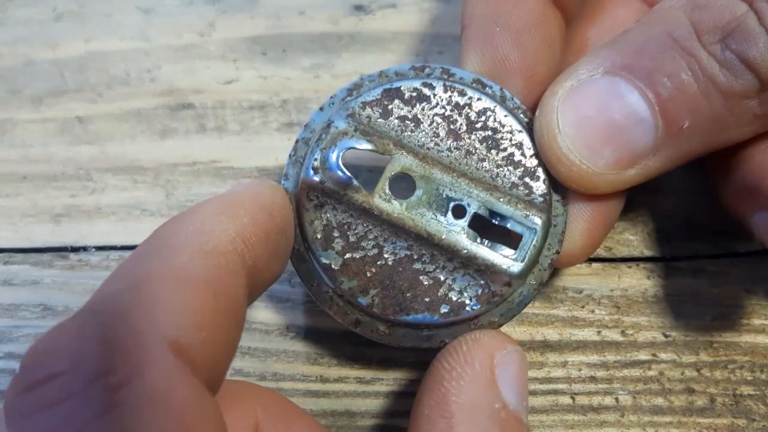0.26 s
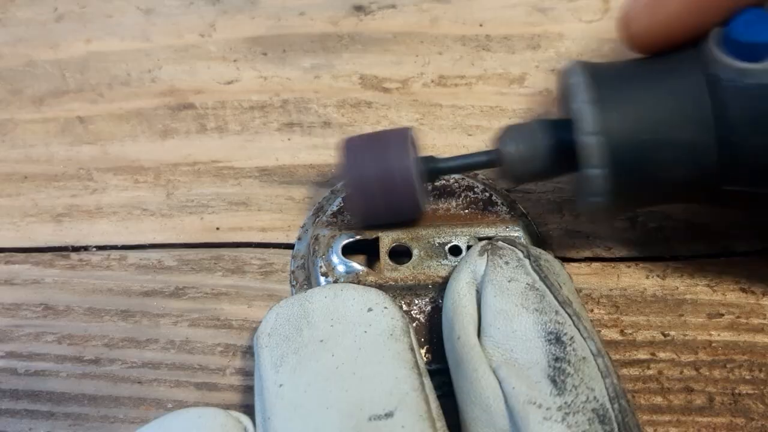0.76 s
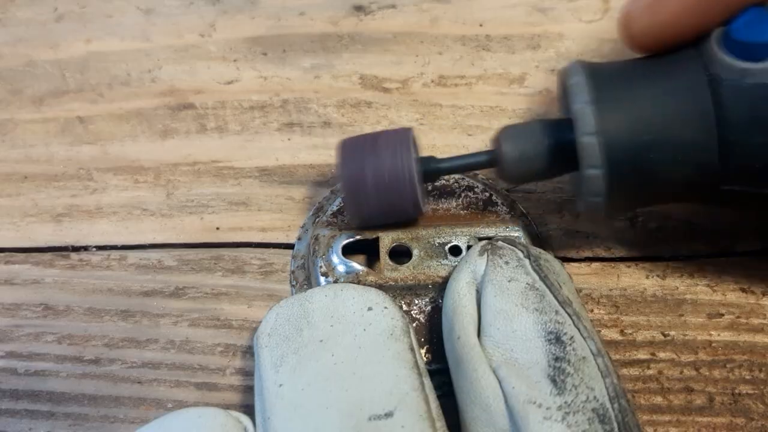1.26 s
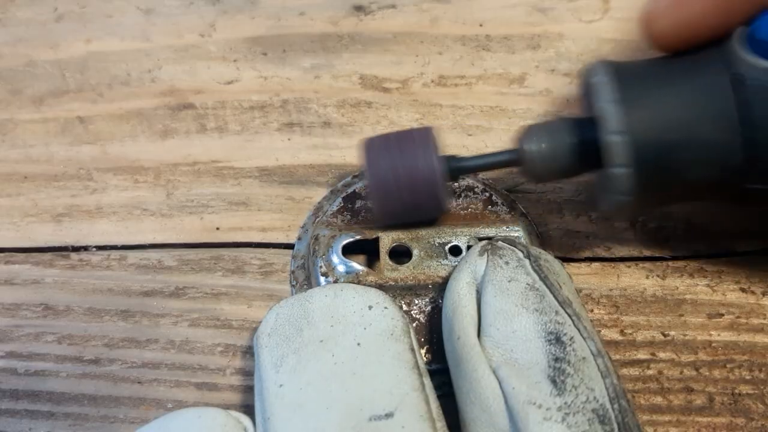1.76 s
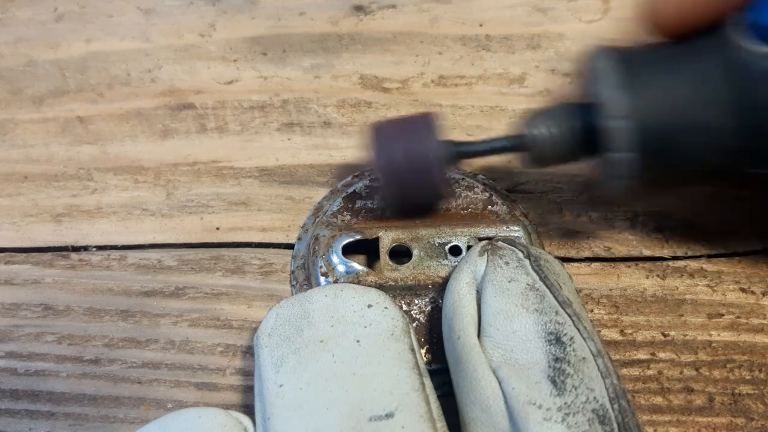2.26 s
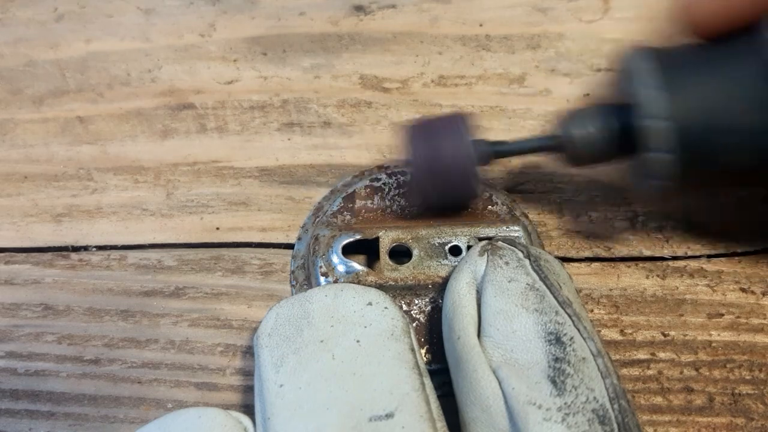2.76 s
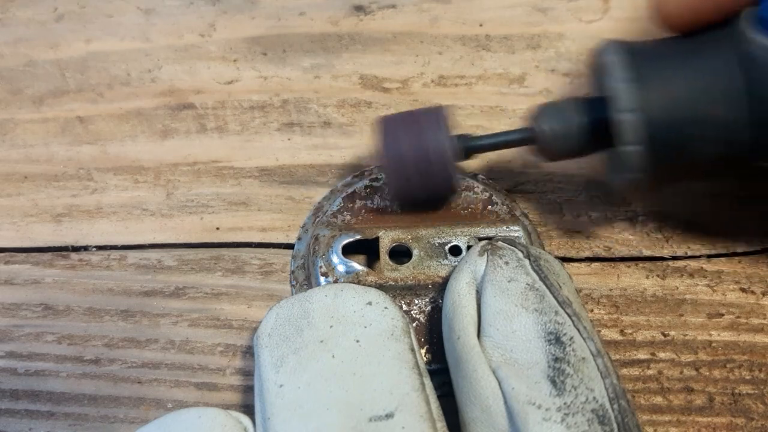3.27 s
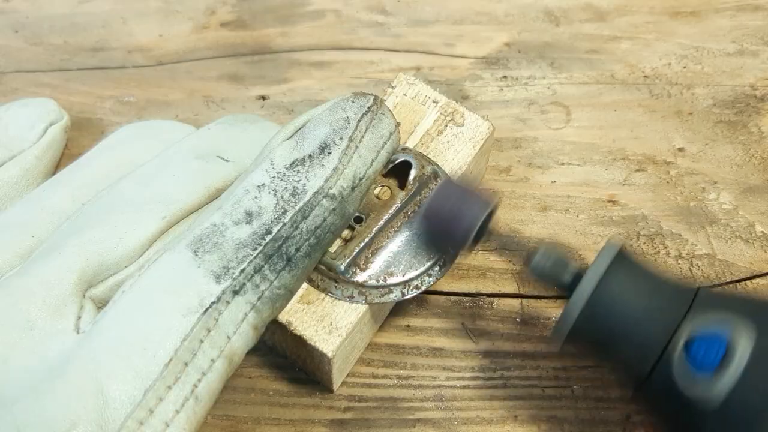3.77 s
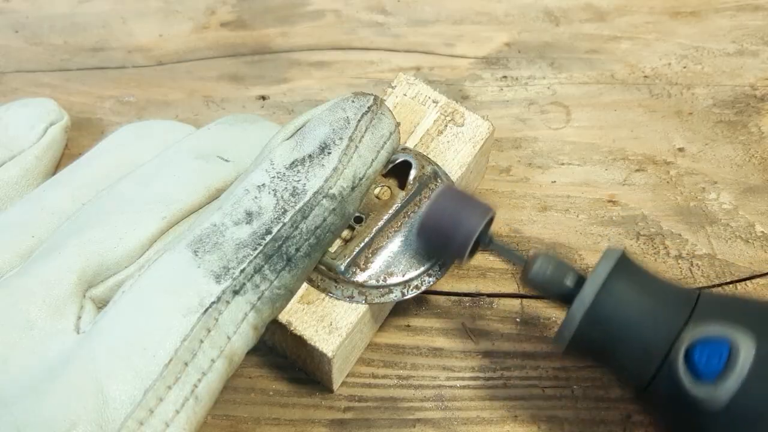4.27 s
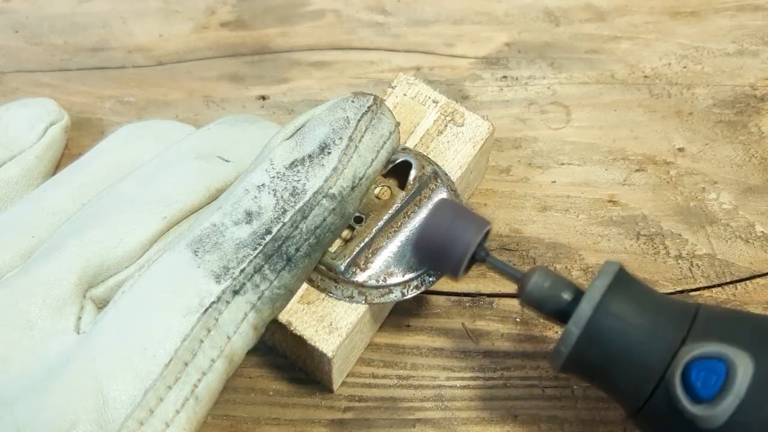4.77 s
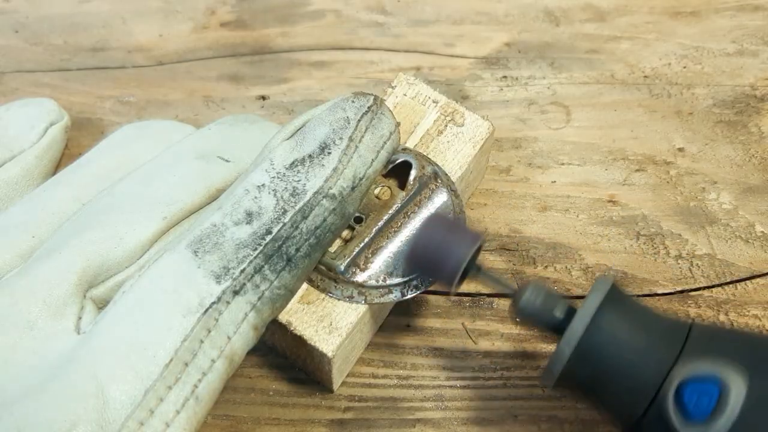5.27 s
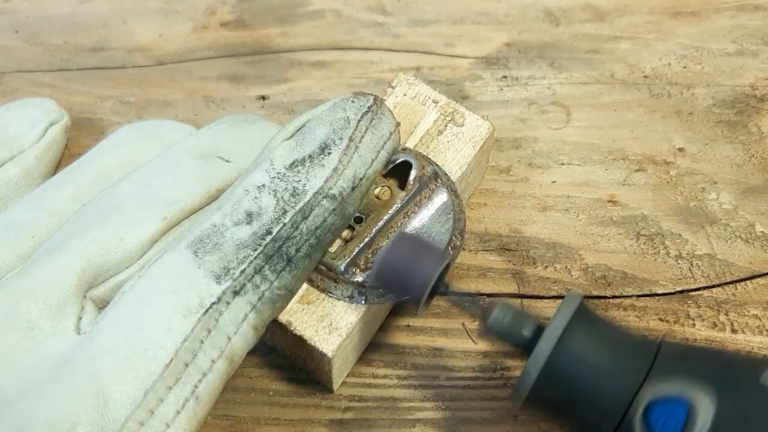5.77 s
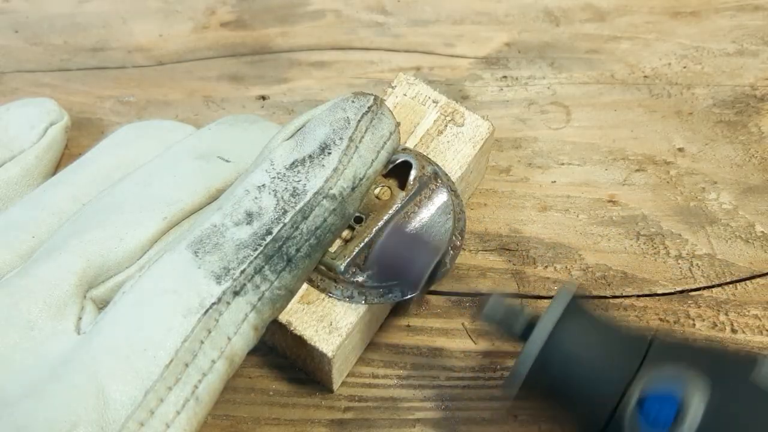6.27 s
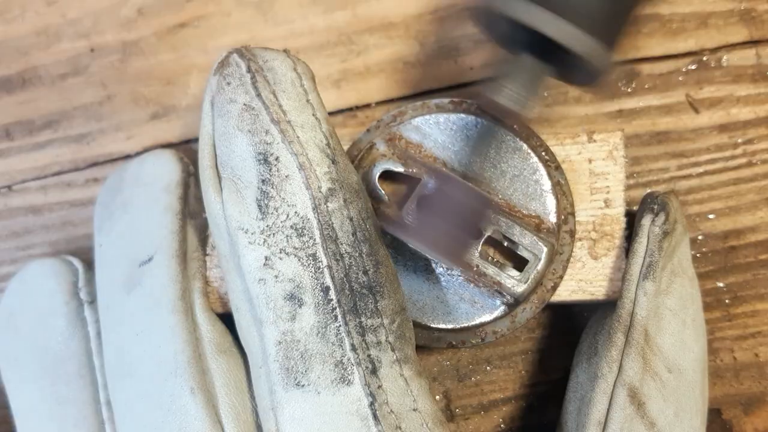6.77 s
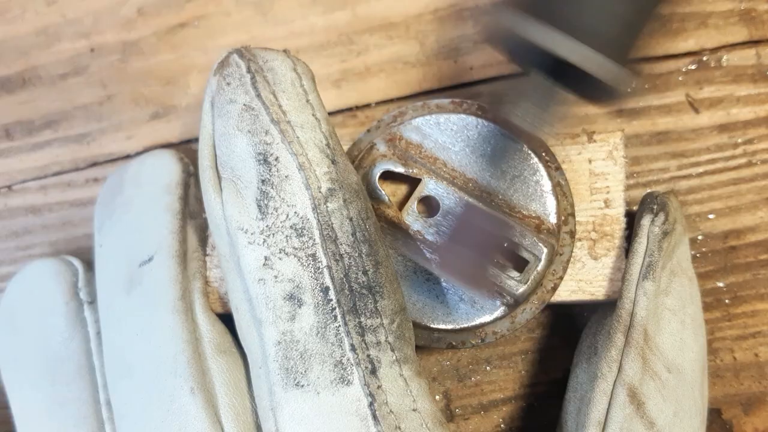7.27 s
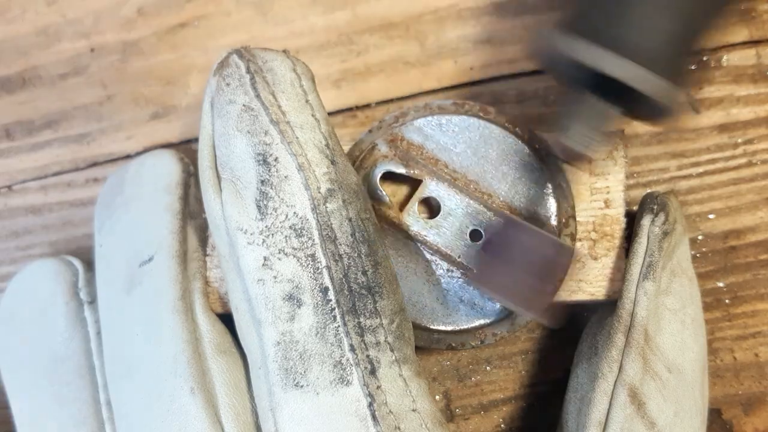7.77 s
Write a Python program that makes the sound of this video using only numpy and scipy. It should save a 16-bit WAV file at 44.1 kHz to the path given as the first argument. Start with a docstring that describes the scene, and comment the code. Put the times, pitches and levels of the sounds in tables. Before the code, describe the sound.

Close stereo sound in a small, dry workshop: faint low room hum, then a sanding drum gritting against thin rusty metal. It scrapes unevenly to and fro with tiny ticks, switches suddenly to a strong ringing whirr that sags and revs up again, then switches to sharp, hissy strokes with a lower buzz, short dropouts and dull thuds to the right. A thin high fan hiss stays underneath; it ends mid-grinding.

```python
"""A small rotary tool sands a rusty metal cap on a wooden bench, in three holds after a moment of quiet room.
Periodic excitation: an untrue drum bites once or twice a turn and its returning grit drives the modes as a buzz.
Loose grit adds a treble scratch; an unpulsed noise between the bites swells and fades with the strokes.
The unbalanced shaft hums; hard bites knock the bench as damped low sines, mostly in the right channel.
Behind lie the steady hiss of a fan and the filtered noise and mains hum of a workshop."""
import sys
import numpy as np
from scipy import signal
from scipy.fft import rfft, irfft, next_fast_len
from scipy.io import wavfile
from scipy.ndimage import uniform_filter1d, map_coordinates

SR = 44100
rng = np.random.default_rng(int(sys.argv[2]) if len(sys.argv) > 2 else 0)


def pcm_store(signal):
    """Save signal as 16-bit PCM."""
    levels = np.round(np.clip(np.atleast_2d(signal), -1, 1) * 32767)
    wavfile.write(sys.argv[1], SR, levels.astype(np.int16).T)


N = 353858

# boundaries of the holds, where the grip changes: [t/s]
HOLD_BOUNDS = (0.74, 3.682, 6.6, 8.03)
# speed of the drum per hold, sagging with each stroke in the second, drifting slowly in the third:
# [t/s, speed/turns per s]
DRUM_SPEED = [
    [(0.74, 87), (3.68, 87)],
    [(3.69, 74.1), (3.72, 73.2), (3.81, 66.6), (3.87, 66.3), (4.0, 70.9), (4.15, 70.3), (4.29, 79.7),
     (4.34, 80.7), (4.42, 80.1), (4.48, 84.4), (4.53, 85.7), (4.63, 83.9), (4.76, 90), (4.9, 90.1),
     (4.98, 96.1), (5.13, 90.4), (5.21, 96.1), (5.39, 90), (5.47, 94.4), (5.63, 89.6), (5.72, 91.8),
     (5.86, 87.2), (5.97, 89.7), (6.06, 87.5), (6.14, 88), (6.23, 91), (6.3, 87.8), (6.43, 91),
     (6.55, 88.5), (6.59, 90)],
    [(6.6, 71), (6.8, 72), (7.2, 71), (7.5, 69.5), (7.68, 67.5), (7.8, 70), (8.03, 66)],
]
# bite statistics per hold: [width/turns, scatter/dB, jitter/turns, grit kept per turn/0-1,
#   relative level of the unpulsed noise/dB, grain spread/dB, left-channel lag/samples]
CONTACT_STATISTICS = [(0.27, 2, 0.11, 0.19, 1, 5.5, 7.3), (0.17, 0.92, 0.042, 0.86, -12, 5, 4.63),
                      (0.15, 1, 0.063, 0.77, -12.5, 3.5, 6.94)]
# variation per hold: [second bite sway/dB, mode lean/dB, thump share of the rumble/0-1]
VARIATION = [(9.5, 0.5, 0.14), (4.5, 1.5, 0.06), (2.5, 2.5, 0.76)]
# strokes to and fro, each from its turning point:
# [t/s, pause/s, easing off/dB, ring/dB, upper middle register/dB, scratch/dB, second bite level/dB]
HAND_STROKES = [(0.74, 0.062, 5, -0.5, -3.5, -1.5, 1), (1.071, 0.034, 14, -2, -6, 0.5, 0),
                (1.228, 0.1, 9, 6, -13.5, -2.5, -13), (1.572, 0.083, 11, -1.5, -1, -2, -11),
                (1.854, 0.057, 6, 4.5, -6, -2, -3), (2.168, 0.086, 8.5, 3, 7.5, 0, -5),
                (2.381, 0.067, 6, 0.5, 0.3, -1.5, -18), (2.658, 0.07, 7, 0, 10, -1, -2),
                (2.932, 0.11, 4.5, -4.5, -3.5, -0.5, -9), (3.183, 0.045, 6.5, 8, 11, 1, 8),
                (3.33, 0.071, 10.5, 1.5, 1.5, 0.5, -6), (3.611, 0.11, 12.5, 7, 7, 2, 5),
                (3.69, 0.05, 0.0, 2.5, -4, -1.5, -12), (3.988, 0.039, 10.5, 6, 6, 0.5, -6),
                (4.231, 0.15, 4, 2, -13, 0, -11), (4.487, 0.054, 4, 0, 0, 0, -4),
                (4.692, 0.041, 5, 7, -4.5, 0.5, -5), (4.953, 0.02, 8, -2, 9, -0.5, -5),
                (5.169, 0.016, 15, -6, -3, -2, -4), (5.434, 0.02, 10, -0.5, 7, 0.5, -9),
                (5.685, 0.018, 7.5, 0, 6, 0.5, -14), (5.926, 0.028, 3, -2.5, 3, -0.5, -12),
                (6.167, 0.034, 3.5, 4, -7, -1, -9), (6.398, 0.02, 2.5, 0, -4, -0.5, -15),
                (6.602, 0.023, 5, 3, 1, -5, 6), (6.771, 0.025, 19, -2, 2, -1, -4),
                (7.053, 0.062, 12, 4.5, -5, 7, -8), (7.229, 0.062, 7.5, -1, 6, -1.3, -10.5),
                (7.549, 0.032, 18, 5, -14, 0.5, -9.5), (7.797, 0.051, 8, 4, -1, -2, -12)]
# per hold, rows for rumble, ring, upper middle register (scratch in holds 1 and 3, buzz in hold 2)
# and top: [level/dB, share of the easing off, share of the stroke's dB, lag/s]
STROKE_RESPONSE = [
    [(-57, -0.053, -0.1, -0.12), (-42, 0.89, 0.5, -0.013), (-42, 0.18, 0.2257, 0.017),
     (-35, 1, 2.5, 0.00033)],
    [(-61, 0.63, 1.5, -0.00085), (-38.5, 0.51, 0.5, -0.016), (-36.5, 0.7, 0.24, -0.0048),
     (-39, 0.61, 1.14, -0.00035)],
    [(-48, 2.12, 2.5, -0.0026), (-52, 0.28, 0, 0.068), (-41.5, 0.12, 0.16, 0.0092),
     (-45, 0.45, 0.4, -0.0029)],
]
# chatter, the drum biting twice a turn: [centre t/s, half length/s, rise of second bite/dB]
CHATTER_SPELLS = [(3.802, 0.061, 10), (6.693, 0.045, 2.5), (6.894, 0.028, 6), (6.987, 0.029, 9),
                  (7.157, 0.022, 7), (7.246, 0.025, 10.5), (7.358, 0.044, 9.5), (7.415, 0.014, 10),
                  (7.864, 0.093, 8.5)]
# the drum snags on an edge: [t/s, nominal peak level/dB]
EDGE_SNAGS = [(0.9826, -24), (1.204, -20), (1.712, -21), (1.781, -21), (1.932, -23), (1.9929, -26),
              (2.263, -26), (2.3423, -26), (2.823, -18), (2.9594, -16), (3.0385, -17), (3.2042, -23),
              (3.29, -27), (3.3043, -21), (3.314, -18.5), (3.3824, -19), (3.44, -23), (3.6386, -20),
              (3.898, -16.5), (3.912, -20), (6.95, -21.5), (7.095, -21), (7.117, -15), (7.6944, -24)]
# the drum hops clear of the metal: [start t/s, length/s, change of the remaining sound/dB]
CLEAR_HOPS = [(3.376, 0.009, -3), (6.77, 0.017, 7.5), (6.935, 0.009, 5), (7.11, 0.008, 0),
              (7.389, 0.011, 5), (7.655, 0.037, 2.5)]
# travel of the contact point per hold: [depth, place in stroke where odd modes lead/0-1, chance]
CONTACT_TRAVEL = [(1.1, 0.44, 0.43), (1.1, 0.77, 1), (1.1, 0.44, 1)]
# edges of the six registers per hold, set by where each grip lets the cap ring: [f/Hz]
REGISTER_EDGES = [(425, 760, 1000, 2300, 7500, 10500, 17000), (335, 760, 1000, 1450, 2300, 6500, 17000),
                  (425, 760, 1000, 2300, 6800, 8800, 17000)]
# level of the growl below the cap's ring, per hold: [t/s, level/dB]
GROWL_LEVEL = [
    [(0.76, -52), (0.77, -43), (1.13, -55), (1.33, -47), (1.69, -55.5), (1.72, -42.5), (1.83, -53),
     (1.85, -37.5), (1.89, -53), (1.92, -47), (2.18, -49.5), (2.53, -51), (2.56, -40.5), (2.59, -56),
     (2.67, -50), (3.67, -54)],
    [(3.7, -49), (3.86, -47), (3.9, -49.5), (4.64, -50), (5.38, -45.5), (5.43, -52), (5.51, -46),
     (5.66, -49), (5.78, -46), (5.82, -54), (6.09, -46.5), (6.18, -58), (6.23, -46.5), (6.4, -55),
     (6.47, -46.5), (6.58, -56)],
    [(6.62, -48), (6.654, -59), (6.722, -47), (6.816, -58), (6.842, -52), (7.08, -60), (7.114, -51),
     (7.272, -57.5), (7.488, -49.5), (7.576, -58), (7.65, -51), (7.664, -51), (7.746, -48.5), (7.834, -56),
     (7.952, -47), (8.0, -54)],
]
# level of the register just above the cap's ring, per hold: [t/s, level/dB]
MIDDLE_LEVEL = [
    [(0.76, -45), (1.1, -48.5), (1.13, -45.5), (1.68, -50), (1.8, -46.5), (1.82, -52), (1.85, -46),
     (1.99, -48), (2.24, -49), (2.26, -41.5), (2.57, -49.5), (2.83, -42.5), (3.01, -49), (3.13, -45),
     (3.2, -46), (3.21, -41.5), (3.29, -46.5), (3.31, -39), (3.36, -49.5), (3.39, -38), (3.39, -46),
     (3.47, -43.5), (3.52, -49.5), (3.67, -45)],
    [(3.7, -32.5), (3.72, -30.5), (3.91, -40.5), (3.92, -43), (4.08, -32), (4.26, -44.5), (4.31, -37),
     (4.4, -34.5), (4.45, -49), (4.57, -33), (4.64, -34), (4.69, -51), (4.72, -42), (4.85, -41),
     (4.89, -42.5), (5.07, -36), (5.18, -45), (5.22, -39.5), (5.38, -36.5), (5.45, -41.5), (5.5, -39),
     (5.73, -42.5), (5.76, -40), (5.96, -42.5), (5.99, -39), (6.27, -45), (6.48, -40.5), (6.5, -48),
     (6.54, -42), (6.58, -43)],
    [(6.62, -45.5), (6.762, -41), (6.768, -46), (6.892, -45.5), (6.938, -49), (6.964, -42), (7.142, -50.5),
     (7.246, -40.5), (7.284, -44.5), (7.372, -44), (7.4, -40), (7.41, -45.5), (7.522, -41), (7.56, -48),
     (7.63, -41.5), (7.664, -51), (7.742, -43), (8.0, -46)],
]
# level of the bright register, swelling with the strokes, per hold: [t/s, level/dB]
BRIGHT_LEVEL = [
    [(0.76, -46.5), (0.99, -44), (1.04, -55), (1.21, -47), (1.25, -52), (1.43, -47), (1.55, -56),
     (1.8, -44.5), (1.81, -51), (1.99, -45), (2.15, -53), (2.17, -49), (2.26, -47.5), (2.43, -51),
     (2.44, -44), (2.74, -54.5), (2.79, -46), (2.93, -47), (2.95, -51), (2.96, -43.5), (2.99, -51),
     (3.07, -46), (3.17, -52), (3.47, -48), (3.6, -52), (3.67, -51)],
    [(3.7, -39.5), (3.75, -37.5), (3.88, -40), (3.91, -39.5), (4.02, -45), (4.07, -36.5), (4.28, -42.5),
     (4.37, -35.5), (4.51, -42), (4.61, -34.5), (4.68, -44), (4.72, -39), (4.97, -38), (5.04, -34),
     (5.14, -37.5), (5.17, -46), (5.18, -36.5), (5.35, -37), (5.44, -42.5), (5.52, -33), (5.66, -39),
     (5.68, -45.5), (5.79, -33.5), (5.9, -43), (6.04, -35.5), (6.18, -47), (6.26, -31), (6.4, -45.5),
     (6.49, -33.5), (6.58, -41)],
    [(6.62, -42.5), (6.704, -39), (6.784, -56), (6.8, -40), (6.904, -35.5), (7.008, -50), (7.146, -33),
     (7.296, -48), (7.358, -33), (7.4, -48), (7.41, -33), (7.568, -51), (7.634, -33.5), (7.684, -61),
     (7.692, -40), (7.738, -34), (7.768, -49), (7.856, -46), (7.884, -34), (8.0, -42)],
]
# averaging time of the levelled cap ring, per hold: [time/s]
RING_AVERAGING = (.16, .05, .12)
# broad spectral colour of holds 1 to 3: [f/Hz, relative level per Hz/dB]
FIRST_COLOUR = [(24, -51), (40, -11.5), (171, -6), (329, -22), (460, -13), (896, -12), (1370, -0.5),
                (3300, -1), (5310, -15), (8770, -13.5), (9690, -9.5), (11800, -17), (16000, -18)]
SECOND_COLOUR = [(24, -64), (40, -50), (176, -46), (320, -50), (365, -22), (405, -47), (455, -10),
                 (556, -9.5), (685, -11.5), (735, -1.5), (830, -35), (896, -49), (1000, -8), (1300, -3),
                 (2000, 4.5), (2260, -8), (5050, -10), (13000, -18.5), (16000, -34)]
THIRD_COLOUR = [(24, -48), (40, -27), (137, -18), (516, -12), (751, -6.5), (990, -8), (1240, -5),
                (3470, -6.5), (5180, -4.5), (7000, -20), (7930, -4), (10200, -12), (16000, -25)]
COLOURS = (FIRST_COLOUR, SECOND_COLOUR, THIRD_COLOUR)
# modes of cap, support and gripped tool in holds 1 to 3:
# [f/Hz, bandwidth/Hz (with a lower limit), relative level/dB]
FIRST_MODES = [(880, 15.3, 5.5), (501, 30, -8), (1170, 9.2, 8.5), (1720, 220, 6), (2177, 124, 11.5),
               (2460, 140, 3), (3243, 126, 6.5), (8650, 410, 3), (11280, 470, -0.5), (12170, 400, -0.5),
               (12720, 250, -4), (13600, 400, -10), (14500, 250, -7)]
SECOND_MODES = [(910.4, 15.7, 7), (1119, 62, 0.5), (2050, 100, 4), (3024, 350, -6), (4380, 260, -1.5),
                (4990, 200, -2), (8140, 270, -13.5), (8910, 700, -11.5), (11040, 1600, -13.5),
                (14830, 980, -10)]
THIRD_MODES = [(751, 32, -1.5), (1225, 37, 3), (1537, 39, 3.5), (2500, 130, -1.5), (3210, 120, -10),
               (4360, 86, 0), (5160, 290, -0.5), (7850, 150, 10), (8020, 170, 1), (9440, 200, -8),
               (12000, 670, -7.5), (13500, 870, -17), (15000, 400, -6.5), (15400, 300, -10)]
MODES = (FIRST_MODES, SECOND_MODES, THIRD_MODES)
# left minus right channel in holds 1 to 3: [f/Hz, level difference/dB]
FIRST_BALANCE = [(60, 10.5), (110, 1), (200, 4), (380, 0.5), (700, -0.5), (1290, -1), (2380, -2.5),
                 (4400, -2), (8120, -2.5), (15000, 0.5)]
SECOND_BALANCE = [(60, 14), (110, -3), (200, 4.5), (380, 0.5), (700, -0.5), (1290, 0), (2380, -1.5),
                  (4400, -0.5), (8120, -4), (15000, 1.5)]
THIRD_BALANCE = [(60, -25), (110, -31), (200, -17.5), (380, -14), (700, 1.5), (1290, 2), (2380, -2.5),
                 (4400, -3.5), (8120, -8), (15000, 2.5)]
BALANCES = (FIRST_BALANCE, SECOND_BALANCE, THIRD_BALANCE)
# power share that each channel hears alone, per hold: [rumble/0-1, buzz/0-1, scratch/0-1]
UNSHARED = [(.2, .2, .36), (.3, .16, .4), (.9, .24, .38)]
# narrow bands that swell or fade for a while: [centre t/s, half length/s, f/Hz, swell/dB]
BAND_FLARES = [(0.82, .08, 2400, -6), (1.42, .18, 4300, 5), (3.8, 0.14, 1430, -11), (4.1, .12, 1370, -10),
               (3.805, 0.11, 1900, 0), (4.2, .06, 8700, 5), (4.45, 0.16, 1250, 4.5), (4.46, 0.035, 8600, 8),
               (4.81, 0.064, 1420, 5.5), (5.05, 0.15, 1490, -8), (5.04, 0.07, 7700, 7.5),
               (5.2, 0.091, 2780, -15), (5.3, 0.085, 7700, 6.5), (6.1, 0.64, 1390, 4.5),
               (6.25, .25, 2800, 4.5), (6.27, 0.031, 8650, 11.5), (6.4, .2, 4560, -5.5),
               (6.5, .06, 2700, 5), (6.7, .08, 2650, 4.5), (6.886, 0.057, 5170, 3.5),
               (7.47, 0.051, 5140, 2), (7.92, 0.07, 1470, 4.5), (7.938, 0.046, 5000, 5)]
# hum of the unbalanced shaft: [t/s, once-a-turn level/dB, twice-a-turn level/dB]
SHAFT_HUM = [(0.74, -64, -66), (1.31, -58.5, -71), (2.35, -67, -57), (2.72, -64, -60), (3.22, -52, -58.5),
             (3.7, -60.5, -75), (3.84, -78, -81), (4.27, -68.5, -64), (4.88, -64, -62.5),
             (5.24, -68, -65.5), (5.9, -66, -60.5), (6.53, -71, -57.5), (6.72, -82, -78)]
# hard bites that knock through the block into the bench: [t/s, approximate right-channel peak/dB]
BENCH_THUDS = [(6.845, -44), (6.897, -41), (6.949, -43), (7.096, -34), (7.117, -28), (7.346, -39),
               (7.693, -31.5), (7.985, -38)]
# noise colour of the quiet workshop: [f/Hz, relative level per Hz/dB]
ROOM_COLOUR = [(18, -75), (30, -10), (109, -10), (149, -11.5), (204, -12), (259, -11), (295, -22),
               (364, -22.5), (937, -37.5), (2900, -52.5), (16000, -54.5)]
# mains hum: [f/Hz, rms level/dB]
MAINS_HUM = [(199.2, -71), (301.5, -78.5)]

BUZZ_TOP_HZ = 2300  # the returning grit is heard in registers up to here
BITE_SKEW = 0.35  # a bite comes on quicker than it lets go (0-1)
SCRATCH_SHARPNESS, SCRATCH_UNPULSED_DB = 1.134, -2  # the treble has shorter bites and less between them
SNAG_DECAY_S, HOP_EDGE_S = 0.00089, 0.0033
STROKE_BLEND_S = 0.043  # one stroke's level slides into the next
FLICKER_DB, FLICKER_PER_S = 1.5, 14
LEVELLING_S = 0.14  # averaging time of a register's level
FLARE_Q = 10.2
THUD_HZ, THUD_DECAY_S, THUD_LEFT_DB = 194, 0.0028, -25
FAN_HZ, FAN_WIDTH_HZ, FAN_DB = 15350, 500, -55
ROOM_DB = -68.5  # rms of the part alike in both channels


def hold(index):
    """Source-filter principle: drum contact excites the cap's modes, heard in six registers over a rumble."""
    width, scatter_db, jitter, kept, unpulsed_db, grain_db, lag = CONTACT_STATISTICS[index]
    second_sway_db, lean_db, thump = VARIATION[index]
    unshared_rumble, unshared_buzz, unshared_scratch = UNSHARED[index]
    edges = REGISTER_EDGES[index]
    start_s, stop_s = HOLD_BOUNDS[index:index + 2]
    start, stop = int(start_s * SR), min(int(stop_s * SR), N)
    t = np.arange(start, stop) / SR

    def curve(table):
        return np.interp(t, *np.transpose(table[index]))

    rows = [row for row in HAND_STROKES if start_s <= row[0] + .05 < stop_s]
    second_db, (rumble_db, ring_db, upper_db, top_db) = stroke_levels(t, rows, STROKE_RESPONSE[index])
    register_db = [curve(GROWL_LEVEL), ring_db, curve(MIDDLE_LEVEL), upper_db, curve(BRIGHT_LEVEL), top_db]
    turn = np.cumsum(curve(DRUM_SPEED)) / SR

    # pressed harder, the opposite side of the drum touches too
    second_db = second_db + second_sway_db * sway(len(t), 9.04)
    second = undb(second_db) * bites(turn + .5, width, scatter_db, jitter)
    touch = bites(turn, width, scatter_db, jitter) + second
    touch = touch / np.sqrt(uniform_filter1d(touch ** 2, SR // 12))
    down = contact_gates(t)  # one row per hop: 1 touching, 0 clear
    all_down = np.prod(down, axis=0)
    touch = touch * all_down

    # a snag is set against the total level of the scratch registers
    scratch_power = sum(undb(2 * db) for db, top in zip(register_db, edges[1:]) if top > BUZZ_TOP_HZ)
    snag = snags(t, 10 * np.log10(scratch_power))
    unpulsed = undb(unpulsed_db)
    left_place = np.arange(len(t)) - lag - 0.44 * sway(len(t), 4.1)
    reach = mode_reach(t, rows, stop_s, CONTACT_TRAVEL[index])

    def noise():
        return rng.standard_normal(len(t))

    def stereo(draw, unshared):
        """Partial coherence: a shared part, late on the left, is mixed with a part of each channel's own."""
        shared = draw()
        late = map_coordinates(shared, [left_place], order=3, mode="nearest")
        channels = []
        for common, side in ((late, 1), (shared, -1)):
            x = np.sqrt(1 - unshared) * common + np.sqrt(unshared) * draw()
            # one end of the stroke favours odd modes, the other even ones; the first listed rings throughout
            odd = coloured(reach * x, COLOURS[index], MODES[index], BALANCES[index], side, lean_db)
            even = coloured((1 - reach) * x, COLOURS[index], MODES[index], BALANCES[index], side, -lean_db)
            channels.append(odd + even)
        return np.array(channels)

    def buzz_drive():
        return touch * grit(turn, kept) + (unpulsed + 0.58 * snag) * noise()

    def scratch_drive():
        background = unpulsed * undb(SCRATCH_UNPULSED_DB) + 0.72 * snag
        return touch ** SCRATCH_SHARPNESS * loose_grains(len(t), grain_db) + background * noise()

    def rumble_drive():
        return (1 - thump + thump * touch) * noise()

    buzz = stereo(buzz_drive, unshared_buzz)
    scratch = stereo(scratch_drive, unshared_scratch)
    rumble = register(stereo(rumble_drive, unshared_rumble), 1, edges[0], LEVELLING_S)
    rumble = rumble * (1 - thump + thump * all_down)
    sound = rumble * undb(rumble_db) + shaft_hum(t, turn)
    for k, (low, top, db) in enumerate(zip(edges, edges[1:], register_db)):
        source = scratch if top > BUZZ_TOP_HZ else buzz
        averaging_s = RING_AVERAGING[index] if k == 1 else LEVELLING_S
        sound = sound + register(source, low, top, averaging_s) * undb(db)

    hop_gain = undb(np.array(CLEAR_HOPS)[:, 2] @ (1 - down))
    onset = np.clip((t - t[0]) / 0.005, 0, 1)
    out = np.zeros((2, N))
    out[:, start:stop] = flare(sound, t) * hop_gain * onset
    return out


def bites(turn, width, scatter_db, jitter):
    """Periodic contact: a high spot bites once a turn, with random strength and timing."""
    chance = rng.standard_normal((int(turn[-1]) + 3, 2))
    envelope = 0
    for near in (np.floor(turn - .5), np.floor(turn + .5)):
        strength, timing = chance[near.astype(int) + 1].T
        offset = turn - near - .5 - jitter * timing
        skewed_width = width * (1 + BITE_SKEW * np.sign(offset))
        envelope = envelope + undb(scatter_db * strength) * np.exp(-.5 * (offset / skewed_width) ** 2)
    return unit(envelope)


def grit(turn, kept, size=256):
    """Correlated roughness: part of each turn's pattern returns in the next, giving a buzz at the turn rate."""
    fresh = rng.standard_normal((int(turn[-1]) + 32, size))
    rows = signal.lfilter([1], [1, -kept], fresh, axis=0)[30:]  # drop the settling turns
    return unit(np.interp(turn * size, np.arange(rows.size), rows.ravel()))


def loose_grains(size, grain_db):
    """Impulsive noise: random grain strengths in dB scale a white noise."""
    strength = np.minimum(rng.exponential(size=size), 4)
    return unit(rng.standard_normal(size) * undb(grain_db * strength))


def snags(t, scratch_db):
    """Transient excitation: each snag jumps up and decays exponentially, relative to the scratch."""
    return sum(undb(db - scratch_db) * np.exp(-np.maximum(t - at, 0) / SNAG_DECAY_S) * (t >= at)
               for at, db in EDGE_SNAGS)


def contact_gates(t):
    """Loss of contact: a gate closes for each hop, with short linear edges."""
    return np.array([np.clip((abs(t - at - length / 2) - length / 2) / HOP_EDGE_S, 0, 1)
                     for at, length, _ in CLEAR_HOPS])


def mode_reach(t, rows, stop_s, travel):
    """Position-dependent coupling: the sliding contact point favours odd or even modes in turn."""
    depth, lead, chance = travel
    stroke = np.interp(t, [row[0] for row in rows] + [stop_s], np.arange(len(rows) + 1))
    return .5 + .5 * np.tanh(depth * np.cos(2 * np.pi * (stroke - lead)) + chance * sway(len(t), 10.7))


def stroke_levels(t, rows, response):
    """Force modulation: the hand eases off at each turning point and sets the levels of a stroke."""
    at, pause, ease_db, ring_db, upper_db, scratch_db, second_db = np.transpose(rows)

    def steps(column, u):
        return column[0] + np.diff(column) @ (.5 + .5 * np.tanh((u - at[1:, None]) / STROKE_BLEND_S))

    levels = []
    columns = (scratch_db, ring_db, upper_db, scratch_db)  # for rumble, ring, upper middle, top
    for (level_db, eased, share, lag), column in zip(response, columns):
        easing = ease_db @ np.exp(-.5 * ((t - lag - at[:, None]) / pause[:, None]) ** 2)
        flicker = FLICKER_DB * sway(len(t), FLICKER_PER_S)
        levels.append(level_db - eased * easing + share * steps(column, t - lag) + flicker)
    chatter_db = sum(db * np.exp(-((t - centre) / half) ** 4) for centre, half, db in CHATTER_SPELLS)
    return steps(second_db, t) + chatter_db, levels


def flare(sound, t):
    """Time-varying band-pass gain: narrow bands swell or fade for a while."""
    change = np.zeros_like(sound)
    for centre, half, hz, db in BAND_FLARES:
        near = slice(*np.searchsorted(t, (centre - 2 * half, centre + 2 * half)))
        if near.stop > near.start and t[0] < centre < t[-1]:
            narrow = signal.lfilter(*signal.iirpeak(hz, FLARE_Q, SR), sound[:, near])
            gain = undb(db * np.exp(-((t[near] - centre) / half) ** 4))
            change[:, near] += (gain - 1) * narrow
    return sound + change


def shaft_hum(t, turn):
    """Rotating imbalance: sines at once and twice the turn rate."""
    times, *levels = np.transpose(SHAFT_HUM)
    return sum(undb(np.interp(t, times, db)) * np.sin(2 * np.pi * (k + 1) * turn)
               for k, db in enumerate(levels))


def thuds():
    """Impulse response of a damped mode: short decaying sines, weaker on the left."""
    table = np.array(BENCH_THUDS)
    since = np.maximum(np.arange(N)[None] / SR - table[:, :1], 0)
    knock = undb(table[:, 1]) @ (np.exp(-since / THUD_DECAY_S) * np.sin(2 * np.pi * THUD_HZ * since))
    return 2 * knock * undb([[THUD_LEFT_DB], [0]])  # 2 offsets the decay before the first crest


def fan():
    """Narrow-band noise: the cooling fan hisses thinly and evenly from the first hold on."""
    peak = signal.iirpeak(FAN_HZ, FAN_HZ / FAN_WIDTH_HZ, SR)
    air = signal.lfilter(*peak, rng.standard_normal((2, N)))
    return unit(air) * undb(FAN_DB) * (np.arange(N) > HOLD_BOUNDS[0] * SR)


def room():
    """Frequency-dependent coherence: rumble more alike in both channels than the faint hiss, over mains hum."""
    mid, side = (coloured(rng.standard_normal(N), ROOM_COLOUR) for _ in range(2))
    side = high_pass(side, 420) + 0.56 * side
    t = np.arange(N) / SR
    hum = sum(np.sqrt(2) * undb(db) * np.sin(2 * np.pi * hz * t) for hz, db in MAINS_HUM)
    return undb(ROOM_DB) * np.array([mid + side, mid - side]) / np.sqrt(np.mean(mid ** 2)) + hum


def coloured(x, colour, modes=(), tilt=((1, 0), (2, 0)), side=0, lean_db=0):
    """Minimum-phase filtering: broad colour plus resonances, made causal through the cepstrum."""
    hz = np.arange(4097) * SR / 8192
    power = undb(2 * on_log(hz, colour))
    for k, (f, width, db) in enumerate(modes):
        width = max(width, 26 + f / 100)  # no mode is narrower than this, so none rings long
        lean = (k > 0) * (-1) ** k * lean_db
        power = power + undb(2 * (db + lean)) / (1 + (2 * (hz - f) / width) ** 2)
    # half of the left-right difference goes to each side
    log_gain = .5 * np.log(power) + side * on_log(hz, tilt) * np.log(10) / 40
    cepstrum = irfft(log_gain)
    cepstrum[1:4096] *= 2
    cepstrum[4097:] = 0
    impulse = irfft(np.exp(rfft(cepstrum)))[:4096]
    return signal.oaconvolve(x, impulse)[:len(x)]


def register(x, low, top, averaging_s):
    """Band splitting: soft edges sum to flat, and the slow rms of the two channels' average is held at 1."""
    size = next_fast_len(x.shape[1])
    octave = np.log2(np.arange(size // 2 + 1) * SR / size + 1)
    rise, fall = [np.clip(.5 + (octave - np.log2(hz)) / .2, 0, 1) for hz in (low, top)]
    y = irfft(rfft(x, size) * (rise - fall), size)[:, :x.shape[1]]
    return y / np.sqrt(uniform_filter1d(np.mean(y, axis=0) ** 2, int(SR * averaging_s)))


def sway(size, rate):
    """Low-pass random motion: twice-smoothed random steps, of rms 1."""
    k = int(SR / rate)
    steps = np.repeat(rng.standard_normal(size // k + 1), k)
    return unit(uniform_filter1d(uniform_filter1d(steps, k), k)[:size])


def high_pass(x, hz):
    """Fourth-order Butterworth response: flat above the corner, falling below it."""
    return signal.sosfilt(signal.butter(4, hz, "high", fs=SR, output="sos"), x)


def on_log(hz, table):
    """Logarithmic frequency scale: interpolate a (f/Hz, value) table along it."""
    f, value = np.transpose(table)
    return np.interp(np.log(hz + 1), np.log(f + 1), value)


def undb(db):
    """Decibel definition: convert a level to an amplitude ratio."""
    return 10 ** (np.asarray(db) / 20)


def unit(x):
    """Root-mean-square normalisation to 1."""
    return x / np.sqrt(np.mean(x ** 2))


def scene():
    """Superposition: the three holds, the bench, the fan and the room add."""
    return sum(hold(index) for index in range(3)) + thuds() + fan() + room()


def record(dry):
    """Band limitation: the deepest bass is thinned and the top cut steeply."""
    dry = high_pass(dry, 52)
    return signal.sosfilt(signal.ellip(16, .2, 70, 15800, fs=SR, output="sos"), dry)


dry = scene()
out = record(dry)
pcm_store(out)
```